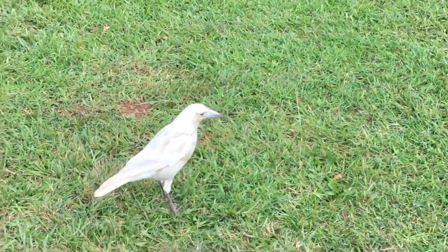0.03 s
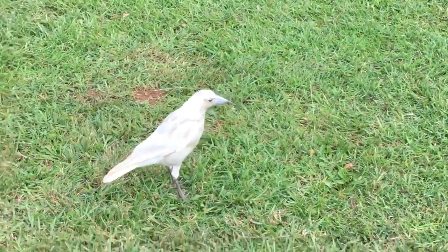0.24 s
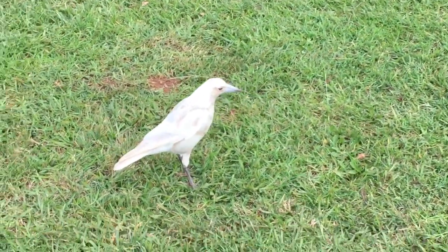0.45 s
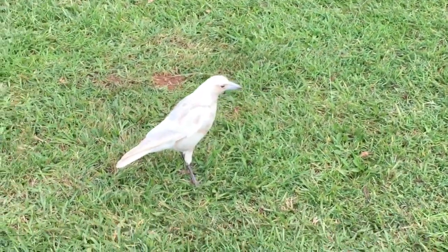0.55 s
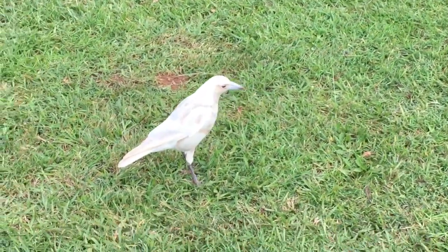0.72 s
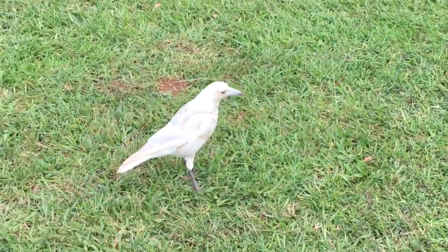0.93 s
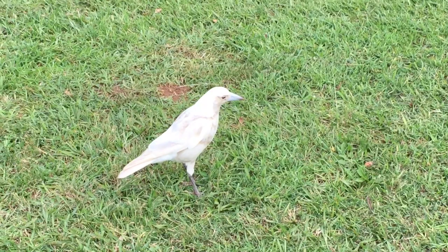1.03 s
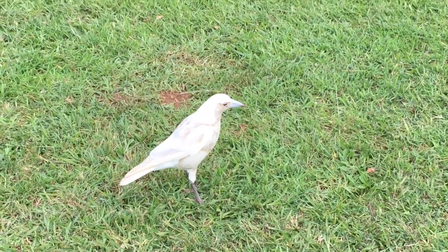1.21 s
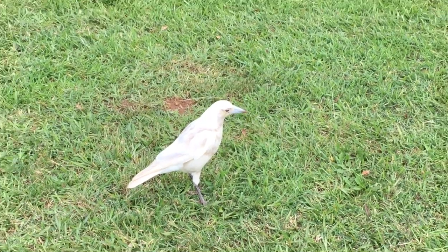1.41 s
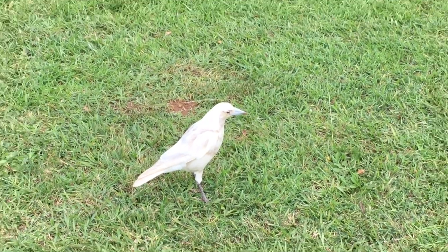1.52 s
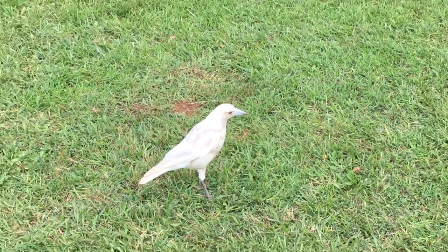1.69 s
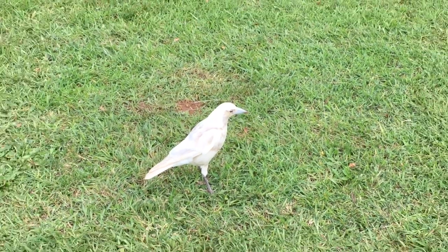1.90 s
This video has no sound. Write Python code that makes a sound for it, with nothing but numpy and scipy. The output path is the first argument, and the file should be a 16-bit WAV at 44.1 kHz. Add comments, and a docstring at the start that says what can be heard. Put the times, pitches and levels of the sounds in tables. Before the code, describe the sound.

A magpie gives two short, harsh warbles outdoors over a faint low rumble.

```python
"""A magpie on a lawn gives two short, harsh warbles. Its voice flips between a low, reedy sound
and a high whistle, and turns raspy at the breaks; its throat and beak shape the tone.
A wall and the garden throw the calls back. Far off, a dove coos and a small bird whistles,
over a soft hiss of outdoor air, a distant drone and a low rumble."""
import sys
import numpy as np
from scipy import signal
from scipy.fft import rfft, irfft, next_fast_len
from scipy.io import wavfile
from scipy.ndimage import map_coordinates

SR = 44100
rng = np.random.default_rng(int(sys.argv[2]) if len(sys.argv) > 2 else 0)


def wav_record(signal):
    """Record a signal, one row per channel, as 16-bit PCM in the file named by sys.argv[1]."""
    frames = np.transpose(np.atleast_2d(signal))
    bounded = np.clip(frames, -1, 1)
    # unit amplitude maps onto the largest positive 16-bit level
    quanta = np.round(bounded * 32767).astype(np.int16)
    wavfile.write(sys.argv[1], SR, quanta)


N = 85995
TOP_HZ = 15750  # upper limit for the harmonics and the microphone


def magpie():
    """Two warbles, each a quick run of notes shaped by the throat and beak."""
    # Each row is a note: start and end in seconds; pitch in Hz at its start, middle and end;
    # level, rise in level, overtone boost and treble boost, all in dB; roughness from 0 to 1.
    first_notes = [ (.222, .261, 2673, 2618, 2720, -39, 10, 2.5, 1, 0.04),
                   (.262, .268, 2526, 3000, 3270, -35, -9, -1, 0, 0.9),
                   (.269, .285, 4096, 4160, 3850, -27.5, -3, 4.5, -25, 0.08),
                   (.289, .308, 2875, 2665, 2850, -38, 4, 7, 2, 0.13),
                   (.308, .312, 3060, 3070, 3040, -31, 10, -14, -5, 0),
                   (.312, .328, 2880, 2864, 2720, -33, 13, 0, -10, 0.16),
                   (.327, .330, 3050, 3120, 3130, -37, 4, -13, -5, 0),
                   (.330, .350, 4050, 4177, 3980, -28, -1.5, 2, -14, 0.1),
                   (.352, .378, 2807, 2821, 2784, -27, 4, 1, 3, 0.13),
                   (.378, .381, 3140, 3250, 3260, -30.5, -4, -8, 0, 0.1),
                   (.381, .404, 4142, 4207, 3663, -27, -8, 5.5, 0, 0.07),
                   (.405, .416, 2842, 2946, 3200, -27, -6, -0.5, 10, 0.18),
                   (.416, .438, 3110, 3024, 2874, -29, 0, -3, 10, 0.24)]
    second_notes = [ (1.507, 1.540, 1541, 1563, 1603, -38.5, -5, -7, -3, 0.057),
                    (1.542, 1.555, 1550, 1566, 1610, -47, -10, -1, 4, 0.3),
                    (1.557, 1.576, 1384, 1415, 1370, -39, 1, 2, -5, 0.77),
                    (1.576, 1.596, 3100, 3400, 3320, -36, 7, 1, -1, .3),
                    (1.596, 1.610, 3045, 2897, 3310, -37.5, -9, 6.5, 1, 0.73),
                    (1.610, 1.617, 3450, 3740, 3840, -31.5, -6, 2.5, 1, .2),
                    (1.617, 1.665, 4535, 4590, 4440, -33, 2, -1.5, -2, 0.035),
                    (1.615, 1.667, 1600, 1654, 1633, -44.5, 4, -1, -2, 1),
                    (1.666, 1.693, 1559, 1610, 1576, -45, -1, 5, 4, 0.26),
                    (1.693, 1.720, 1557, 1580, 1607, -44, -16, 2, -2, 0.13),
                    (1.718, 1.750, 1567, 1575, 1647, -51, -12, 7, 1, 0.14),
                    (1.752, 1.810, 1595, 1650, 1637, -49.5, 1, 2.5, -8, 0.4),
                    (1.812, 1.900, 1609, 1614, 1580, -57, -7, -1, -36, 0.19)]
    # How the throat and beak ring in each call. Each row: frequency in Hz, boost in dB.
    first_throat = [(1500, -39), (2200, -22), (2600, -1), (2850, -13), (3150, 1.5), (4150, 0.5), (4900, -4),
                    (5400, 0), (6100, 7), (7200, -8), (8300, -18.5), (10200, -25.5), (12300, -26),
                    (15000, -52)]
    second_throat = [(1550, -13.5), (2300, -19.5), (3150, -2), (3900, 1), (4750, 0), (5250, -14),
                     (5800, -6.5), (6600, 2.5), (7400, -13.5), (7900, -24), (9400, -8.5), (10900, -26),
                     (12800, -17), (15000, -41)]
    return warble(first_notes, first_throat) + warble(second_notes, second_throat)


def warble(notes, throat):
    """Gliding notes pass through the throat. Roughness shakes the pitch, blurs the tone and adds rasp."""
    attack_s, release_s, fade_in_s = .002, .0033, .014
    treble_hz, noisy_above_hz = 10400, 15000
    rasp_db, hiss_db = -10.5, -32.5
    out, t = np.zeros(N), np.arange(N) / SR
    harmonic = np.arange(1, 10)[:, None]  # whole multiples of the pitch
    jitter, breath = wobble(1115), noise(throat)
    smear = np.array([wobble(700.2) + 1j * wobble(700.2) for _ in harmonic]) / np.sqrt(2)
    for start, end, start_hz, mid_hz, end_hz, db, swell_db, overtones_db, treble_db, rough in notes:
        span = np.flatnonzero((t > start - attack_s) & (t < end + release_s))
        place = np.clip((t[span] - start) / (end - start), 0, 1) * 2 - 1  # -1 at the start, 1 at the end
        pitch = mid_hz + place * (end_hz - start_hz) / 2 + place ** 2 * ((start_hz + end_hz) / 2 - mid_hz)
        phase = 2 * np.pi * np.cumsum(pitch * (1 + .028 * rough * jitter[span])) / SR
        hz = harmonic * pitch
        shelf_db = treble_db / (1 + (treble_hz / hz) ** 20)
        gains = amp(along(throat, hz) + overtones_db * (harmonic > 1) + shelf_db) * (hz < TOP_HZ)
        # The highest harmonics dissolve into noise, even in a smooth note.
        blur = 1.06 * rough * np.sqrt(harmonic) + (hz / noisy_above_hz) ** 4
        tones = np.exp(1j * harmonic * phase) * (1 + blur * smear[:, span]) / np.hypot(1, blur)
        voice = (gains * tones.imag).sum(0)
        rasp = breath[span] * (1 + np.cos(phase)) * (amp(rasp_db) * rough + amp(hiss_db))
        opening = np.clip((t[span] - start) / attack_s / 2 + .5, 0, 1)
        closing = np.clip((end - t[span]) / release_s / 2 + .5, 0, 1)
        level = amp(db + swell_db * place / 2 + place ** 2 - .5)  # sags by 1 dB in the middle
        out[span] += np.sin(np.pi / 2 * opening * closing) ** 2 * level * (voice + rasp)
    age = t - notes[0][0]
    return out * np.clip((age + attack_s) / fade_in_s, 0, 1)


def wall_echoes(sound):
    """The sound bounces back a few times, later, quieter and duller."""
    # Each row is one echo: delay in seconds, level in dB.
    bounces = [(.021, -37.5), (.044, -67), (.075, -29.5), (.108, -14)]
    dull_above_hz = 9800

    def response(hz):
        delayed = sum(amp(db) * np.exp(-2j * np.pi * hz * delay) for delay, db in bounces)
        return delayed / np.hypot(1, (hz / dull_above_hz) ** 2)
    return filtered(sound, response)


def garden_reverb(sound):
    """The garden scatters the sound into a soft tail whose highest and lowest parts die first."""
    # Each row: frequency in Hz, seconds the tail takes to fade by 60 dB.
    fade_times = [(500, 0.2), (3000, 0.78), (6000, 0.65), (9000, 0.65), (14000, 0.12)]
    tail_db, delay_s = -17.5, .018
    hz, t, spectrum = signal.stft(rng.standard_normal(SR), SR, nperseg=256)
    fade = amp(-60 * t / along(fade_times, hz)[:, None])
    tail = signal.istft(spectrum * fade, SR, nperseg=256)[1]
    tail = np.pad(tail / np.linalg.norm(tail), (int(delay_s * SR), 0))
    return amp(tail_db) * signal.fftconvolve(sound, tail)[:N]


def dove():
    """Soft coos that rise and fall a little in pitch, hoarse and blurred by distance."""
    # Each row: start in seconds, length in seconds, top pitch in Hz, level in dB.
    coos = [(.42, 0.138, 613, -57.5), (0.671, 0.316, 625, -52), (1.416, .18, 625.4, -53.5),
            (1.66, 0.386, 615, -51)]
    pitch_bend, roughness = .092, .66
    out, t = np.zeros(N), np.arange(N) / SR
    for start, length, hz, db in coos:
        place = np.clip(2 * (t - start) / length - 1, -1, 1)
        tone = np.exp(2j * np.pi * np.cumsum(hz * (1 - pitch_bend * place ** 2)) / SR)
        blur = 1 + roughness * (wobble(110) + 1j * wobble(110))
        out += amp(db) * (1 - place ** 2) * unit((tone * blur).imag) / np.sqrt(2)
    return out


def small_bird():
    """One faint, slightly shaky whistle that rises in pitch."""
    # Each row: time in seconds, pitch in Hz, level in dB.
    whistle = [(0, 2810, -63), (.03, 2790, -69.5), (.058, 2950, -68), (.075, 3220, -57.5), (.1, 3170, -74),
               (.13, 3170, -100)]
    hz, db = curves(whistle)
    pitch = hz * (1 + .013 * wobble(300))
    return amp(db + 2.3 * wobble(104)) * np.sin(2 * np.pi * np.cumsum(pitch) / SR)


def background():
    """Steady outdoor air, a distant drone and an uneven deep rumble that eases off."""
    # The tone colour of each noise. Each row: frequency in Hz, relative strength in dB.
    air_colour = [(160, -45), (280, -3), (326, -19), (385, -11), (522, -12.5), (821, -14), (1110, -12),
                  (1480, -18), (1840, -11), (2140, -22.5), (3200, -24), (4050, -32), (6380, -35),
                  (10400, -44), (15600, -47)]
    drone_colour = [(70, -42), (105, -5.5), (132, 1), (165, -2), (215, -7), (275, -7.5), (340, -16),
                    (450, -33), (700, -100)]
    rumble_colour = [(20, -26), (30, -7), (45, -6.5), (65, 1), (90, -1), (115, -9), (170, -41), (300, -87)]
    # How the rumble swells and sinks. Each row: time in seconds, level in dB.
    rumble_levels = [(0.0, -48), (0.076, -53), (0.124, -47), (0.172, -55), (0.238, -45), (0.4, -52.5),
                     (0.412, -43.5), (0.744, -53), (0.776, -42), (0.912, -56.5), (1.894, -58.5),
                     (1.95, -51)]
    air_db, drone_db = -56, -51
    rumble_db, = curves(rumble_levels)
    air = amp(air_db + .4 * wobble(8)) * noise(air_colour)
    drone = amp(drone_db + .9 * wobble(18.05)) * noise(drone_colour)
    rumble = amp(rumble_db + 1.3 * wobble(22)) * noise(rumble_colour)
    return air + drone + rumble


def amp(db):
    """Turn decibels into a number to multiply by."""
    return 10 ** (np.asarray(db) / 20)


def unit(sound):
    """Scale a sound to an average power of 1."""
    return sound / np.sqrt(np.mean(sound ** 2) + 1e-20)


def along(points, hz):
    """Read between rows of frequency and value, with octaves evenly spaced."""
    frequencies, values = np.transpose(points)
    return np.interp(np.log(hz + 1), np.log(frequencies + 1), values)


def curves(rows):
    """Turn each column after the time into one value per sample."""
    times, *columns = np.transpose(rows)
    return [np.interp(np.arange(N) / SR, times, column) for column in columns]


def wobble(rate):
    """A smooth curve through `rate` random values a second."""
    values = rng.standard_normal(N // 8)
    return map_coordinates(values, [np.arange(N) * rate / SR], mode="wrap")


def filtered(sound, response):
    """Multiply each frequency in the sound by response(hz)."""
    size = next_fast_len(N + SR // 2)
    return irfft(rfft(sound, size) * response(np.fft.rfftfreq(size, 1 / SR)), size)[:N]


def noise(colour):
    """Noise with the given tone colour and an average power of 1."""
    return unit(filtered(rng.standard_normal(N), lambda hz: amp(along(colour, hz))))


def scene():
    """The near magpie with its echoes, the far birds and the background, in one channel."""
    calls = magpie()
    return (calls + wall_echoes(calls) + garden_reverb(calls) + dove() + small_bird() + background())[None]


def record(dry):
    """The microphone picks up nothing above its upper limit."""
    return filtered(dry[0], lambda hz: hz < TOP_HZ)[None]


dry = scene()
out = record(dry)
wav_record(out)
```